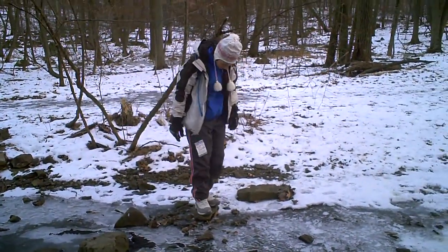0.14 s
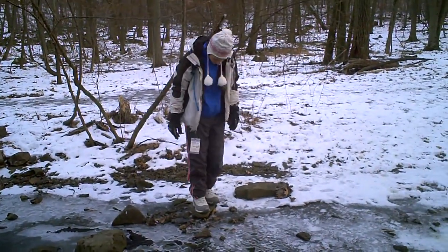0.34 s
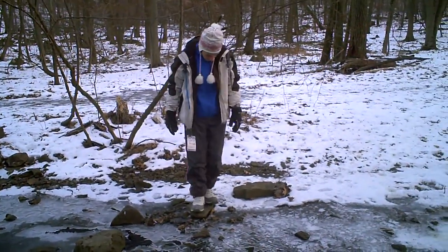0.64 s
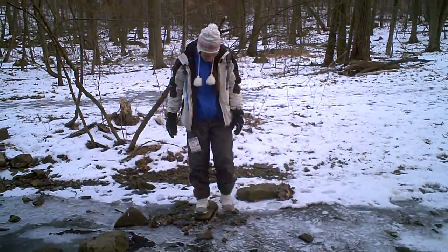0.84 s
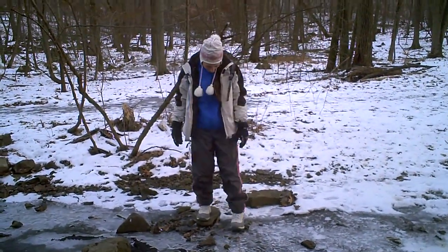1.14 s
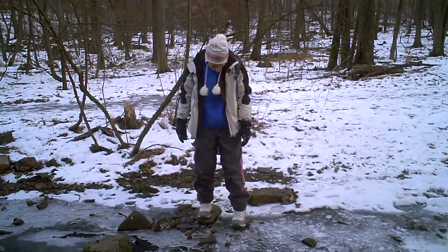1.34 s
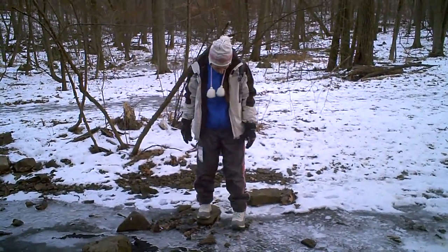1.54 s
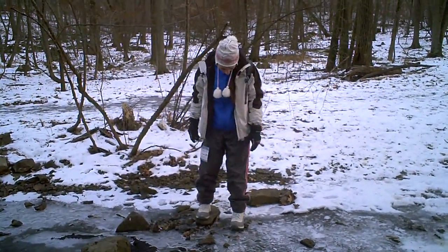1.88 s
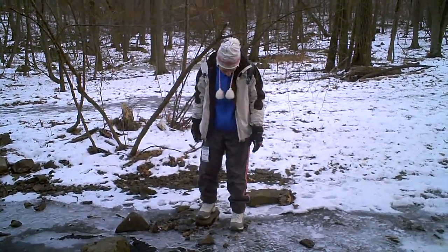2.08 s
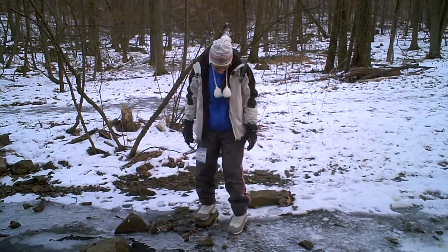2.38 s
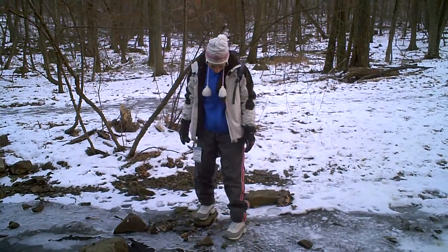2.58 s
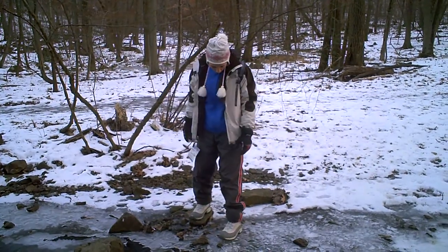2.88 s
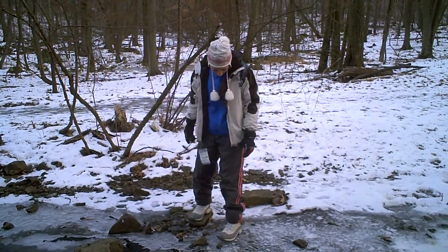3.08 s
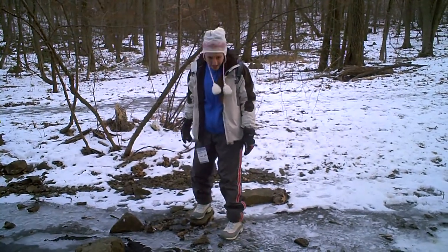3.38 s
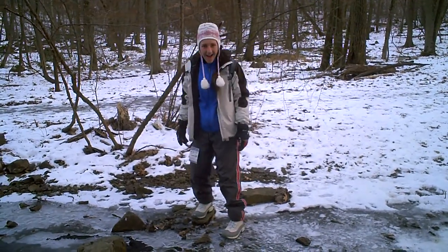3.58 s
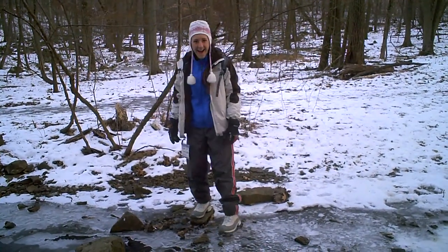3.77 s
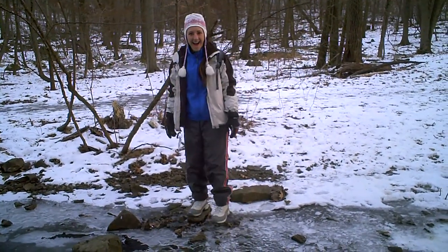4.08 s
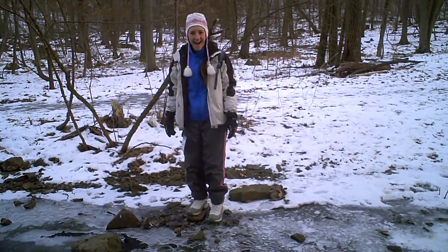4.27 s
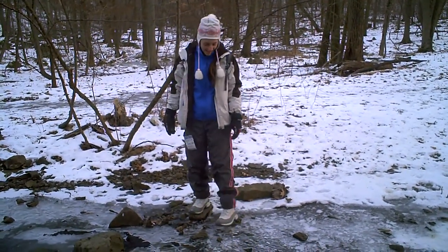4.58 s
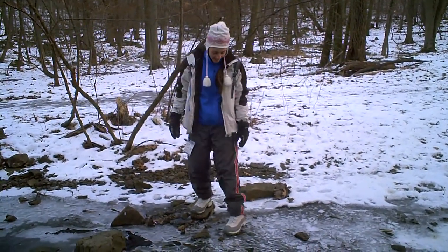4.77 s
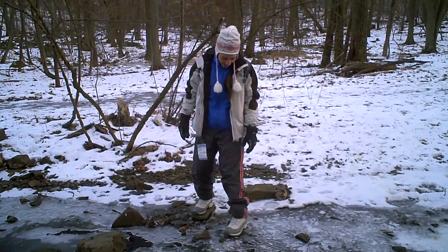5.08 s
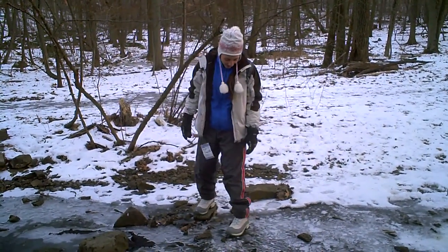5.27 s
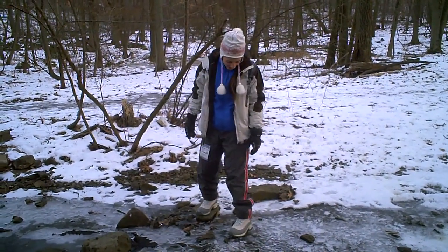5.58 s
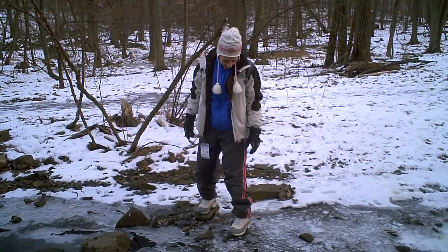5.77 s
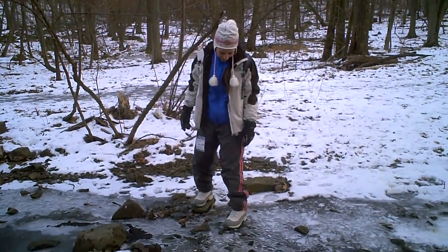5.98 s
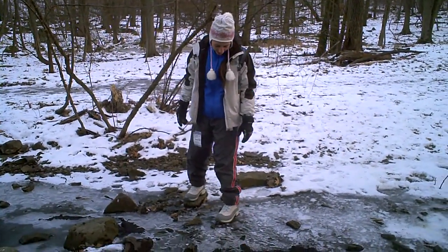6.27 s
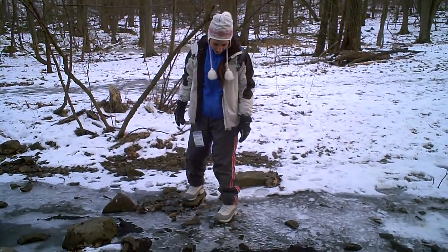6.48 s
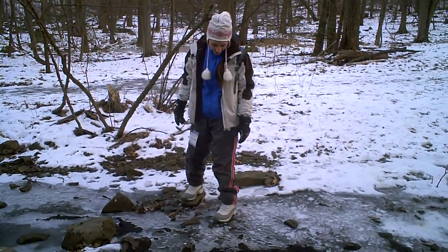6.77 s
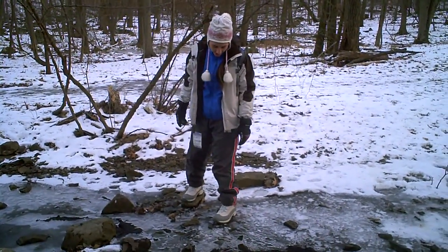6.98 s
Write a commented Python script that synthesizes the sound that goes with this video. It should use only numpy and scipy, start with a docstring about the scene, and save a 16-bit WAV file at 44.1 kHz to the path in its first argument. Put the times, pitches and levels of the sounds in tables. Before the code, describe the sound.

Outdoors in a quiet winter wood, a soft steady water and air rush continues throughout. Nylon clothing swishes faintly, a few tiny ice ticks and sole squeaks follow, then the sheet breaks in a sudden loud burst of bright snaps. After a short scrape and sparse clicks, a longer bout of crunching and cracking begins, with hollow knocks, thinning into scattered crackles. Heard from a few metres away, fairly dry.

```python
"""Boots shift and step on thin ice over a shallow creek in a winter wood, a few metres away.
Smooth noise, the rush of water and far air, lies under it all; nylon swishes first as dense friction grains.
Shards then grind as rattling grains; the sheet snaps in swarms of clicks that ring a plate; soles squeak as bent tones.
Among the snaps it knocks hollow over its air pocket and crumbles in slow swarms; a ribbed sole scrapes by stick
and slip, and midway through the second bout of grinding, separate grains bump a loose slab, one resonant mode."""
import sys
import numpy as np
from scipy import signal
from scipy.fft import rfft, irfft
from scipy.io import wavfile
from scipy.ndimage import uniform_filter1d

SR = 44100
rng = np.random.default_rng(int(sys.argv[2]) if len(sys.argv) > 2 else 0)


def transcribe(u):
    """Save the signal u as a 16-bit wav file named by the first command-line argument.

    u: samples, shape (n,) or (channels, n), limited to [-1, 1]; the rate is SR.
    q: integer samples, one column per channel.
    """
    v = np.clip(np.atleast_2d(u).T, -1, 1)
    q = np.round(v * 32767).astype(np.int16)
    wavfile.write(sys.argv[1], SR, q)


def how_loud(loudness_db):
    """Turn decibels into a plain amplitude multiplier (0 dB gives 1, 20 dB gives 10)."""
    steps = np.asarray(loudness_db, float) / 20
    return 10 ** steps


N = 314675


def curve(rows):
    """Join table columns by straight lines over time; the level column is -120 dB outside the table."""
    s, level_db, *more = np.transpose(rows)
    t = np.arange(N) / SR
    level_db = np.interp(t, s, level_db, left=-120, right=-120)
    return [level_db] + [np.interp(t, s, column) for column in more]


def unit(x):
    """Scale to rms 1."""
    return x / np.sqrt(np.mean(x ** 2) + 1e-18)


def colour(x, points):
    """Minimum-phase filter through (Hz, dB) points, built from the folded cepstrum."""
    hz, db = np.transpose(points)
    grid_hz = np.maximum(np.arange(1025) * SR / 2048, 1)
    log_gain = np.interp(np.log(grid_hz), np.log(hz), db) * np.log(10) / 20
    cepstrum = irfft(log_gain)
    cepstrum[1:1024] *= 2
    cepstrum[1025:] = 0
    impulse = irfft(np.exp(rfft(cepstrum)))
    return signal.fftconvolve(x, impulse)[:len(x)]


def ring(x, hz, width_hz):
    """One damped resonance."""
    return signal.lfilter(*signal.iirpeak(hz, hz / width_hz, SR), x)


def band(x, lo_hz, hi_hz):
    """Butterworth band-pass."""
    return signal.sosfilt(signal.butter(2, [lo_hz, hi_hz], "band", fs=SR, output="sos"), x)


def walk(rate):
    """Random levels held 1 / rate s and slewed twice; spread near 1."""
    k = int(SR / rate)
    held = np.repeat(rng.standard_normal(N // k + 1), k)
    return 1.3 * uniform_filter1d(uniform_filter1d(held, k), k)[:N]


def crackle(size, rate, spread_db):
    """Random clicks of either sign, rate per s: many small, a few large, size capped."""
    chance = rng.random((3, size))
    hit = chance[0] < rate / SR
    sign = np.sign(chance[1] - 0.5)
    return hit * sign * how_loud(-spread_db * np.log(1 - 0.97 * chance[2]))


def add(out, s, x, db):
    """Lay a burst in from time s, its envelope peak at the given level."""
    i = int(s * SR)
    x = x[:len(out) - i]
    out[i:i + len(x)] += x * how_loud(db) / np.max(np.abs(signal.hilbert(x)))


def shards(rate, spread_db, life_s, bed):
    """Each fracture rattles on for a moment, over a bed of countless tiny ones."""
    t = np.arange(512) / SR
    hits = np.abs(crackle(N, rate, spread_db))
    rattle = signal.fftconvolve(hits, np.exp(-t / life_s))[:N]
    return (unit(rattle) + bed) * rng.standard_normal(N)


STROKE_RANGE_DB = 20.5  # lost one rise time before and one fall time after the peak


def strokes(rows):
    """Level in dB of strokes that swell to a peak and fall away; the strongest counts."""
    t = np.arange(N) / SR
    levels_db = [db - STROKE_RANGE_DB * np.maximum((s - t) / rise_s, (t - s) / fall_s)
                 for s, db, rise_s, fall_s in rows]
    return np.max(levels_db, axis=0)


TRAIL = 0.2  # amplitude of splinters that settle three times slower


def add_fracture(out, s, db, hz, body_db, treble_db, t60_s, rise_s, first):
    """A crack runs through the sheet: a first break, a dying swarm of smaller ones, the plate rings briefly."""
    t = np.arange(4096) / SR
    decay = how_loud(-60 * t / t60_s) + TRAIL * how_loud(-20 * t / t60_s)
    fade = (1 - np.exp(-t / rise_s)) * decay * np.cos(np.pi * t / t[-1] / 2)
    swarm = fade * crackle(size=4096, rate=12000, spread_db=3.5)
    swarm[16] = first * np.max(np.abs(swarm))
    mode = unit(ring(swarm, hz, hz * hz / 9000 + 40))
    plate = mode + 0.5 * unit(band(swarm, 0.57 * hz, min(2.19 * hz, 6500)))
    treble = band(band(swarm, 3950, 8350), 3940, 15400)
    body = band(band(swarm, 424, 1160), 335, 1260)
    add(out, s, plate, db + 0.015)
    add(out, s, treble, db + treble_db)
    add(out, s + 0.0012, body, db + body_db)  # low bending waves arrive late


# Rush spectrum: (frequency [Hz], relative density [dB per Hz])
RUSH_SPECTRUM = [(15, -70), (25, -26.5), (170, -13), (344, -2.5), (476, -2.5), (545, -2), (624, -3.5),
                 (796, -1.5), (962, -5), (1520, -13), (2220, -17.5), (7510, -26.5), (16000, -39.5)]
RUSH_DB = -58.5


def wood():
    """Distant water and air: smooth coloured noise, level wandering slightly."""
    rush = unit(colour(rng.standard_normal(N), RUSH_SPECTRUM))
    return how_loud(RUSH_DB + 0.5 * walk(11)) * rush


# Nylon sleeve and leg strokes: (peak time [s], level [dB], rise [s], fall [s])
SWISH_STROKES = [(0.214, -54, 0.22, 0.13), (0.484, -52, 0.24, 0.12), (0.746, -61.5, 0.26, 0.17)]
# Nylon spectrum: (frequency [Hz], relative density [dB per Hz])
NYLON_SPECTRUM = [(710, -29), (1200, -7), (1870, 2), (2200, -3), (5900, -10), (8260, -8.5), (11200, -17),
                  (16000, -35)]


def swish():
    """Very dense fibre friction, nearly smooth."""
    level_db = strokes(SWISH_STROKES) + 0.81 * walk(40.8)
    return how_loud(level_db) * unit(colour(crackle(N, rate=8300, spread_db=2.5), NYLON_SPECTRUM))


# Shards under the sole: (time [s], fine level [dB], thick level [dB])
GRIND_LEVELS = [(0.9, -80, -70.5), (1.7, -79, -67), (2.0, -73, -63), (2.5, -69, -67.5), (2.64, -70, -73),
                (2.74, -58, -60), (2.8, -38, -49), (2.92, -39, -46.5), (3.08, -49.5, -53),
                (3.16, -58, -68.5), (3.56, -65.5, -59), (3.68, -46, -54.5), (3.8, -57, -53),
                (3.92, -66, -57), (4.28, -69, -66.5), (4.4, -60.5, -64), (4.62, -74, -73), (4.68, -55, -42),
                (4.84, -44, -41.5), (5.04, -50.5, -50.5), (5.16, -47, -53), (5.3, -52.5, -39.5),
                (5.46, -62, -48), (5.54, -70, -55.5), (5.64, -49, -56.5), (5.76, -65, -61), (6.0, -54, -50),
                (6.34, -61, -56), (6.5, -67, -52), (6.74, -61.5, -60.5), (7.04, -53.5, -56.5),
                (7.13, -55, -52)]
# Fine shard spectrum: (frequency [Hz], relative density [dB per Hz])
SHARD_SPECTRUM = [(710, -57), (1200, 0.5), (2200, 3.5), (3320, 3), (4910, 6), (5900, 2.5), (7660, -2),
                  (10400, -5), (16000, -50)]
SLIDE_DB, SLIDE_S = -14.5, 0.01  # splinters sliding on, re running rms of the breaks; averaging time


def grind(snapped):
    """Fine shards tick bright and dense, more so after a break; thicker wet ones crunch lower."""
    fine_db, thick_db = curve(GRIND_LEVELS)
    keep = np.exp(-1 / (SLIDE_S * SR))
    slide = how_loud(SLIDE_DB) * np.sqrt(signal.lfilter([1 - keep], [1, -keep], snapped ** 2))
    fine = unit(colour(shards(rate=300, spread_db=5, life_s=0.0012, bed=0.45), SHARD_SPECTRUM))
    thick = unit(band(shards(rate=200, spread_db=5, life_s=0.011, bed=0.35), 364, 1720))
    underway = np.arange(N) / SR > GRIND_LEVELS[0][0]
    return (how_loud(fine_db) + slide) * fine + underway * how_loud(thick_db) * thick


SMALL_SNAPS_PER_S = 12
SMALL_DB, SMALL_SCATTER_DB = 10.5, 3.5  # re thick grinding
SMALL_BODY_DB, SMALL_TREBLE_DB = -10.5, -7  # means, re plate
SMALL_LOW_HZ, SMALL_OCTAVES = 847, 2.06


def small_snaps():
    """Lesser fractures at random once grinding starts, their strength following the thick grinding."""
    count = int(SMALL_SNAPS_PER_S * N / SR)
    when, pitch = rng.random((count, 2)).T
    size, body, treble = rng.standard_normal((count, 3)).T
    position = when * (N - 1)
    grind_db = curve(GRIND_LEVELS)[1][position.astype(int)]
    rows = np.transpose([position / SR - 0.002,
                         grind_db + SMALL_DB + SMALL_SCATTER_DB * size,
                         SMALL_LOW_HZ * 2 ** (SMALL_OCTAVES * pitch ** 2),
                         SMALL_BODY_DB + 6 * body,
                         SMALL_TREBLE_DB + 7 * treble])
    return snaps(rows[rows[:, 0] > GRIND_LEVELS[0][0]])


# Loud snaps of the sheet:
# (time [s], plate level [dB], plate ring [Hz], low body re plate [dB], treble re plate [dB])
LOUD_SNAPS = [(1.0406, -42.5, 2000, -15, -12), (1.0665, -46, 2040, -15, -20),
              (1.079, -41.5, 1650, -14, -13), (1.1524, -49.5, 2030, -12, -2), (1.1774, -54, 1130, -2, 1),
              (2.3195, -45.5, 1730, -14, -3), (2.386, -37, 1620, -29, -34), (2.6329, -29.5, 2100, -31, -22),
              (2.6613, -18.5, 2010, -15, -9), (2.7039, -20, 1680, -37, 3), (2.751, -18, 2090, -28, -12),
              (2.7788, -6.5, 2050, -19, -10), (2.7903, -13, 3200, -18, -9), (2.7963, -20.5, 1990, -9.5, -2),
              (2.8161, -20.5, 3380, -34, 0), (2.8199, -11.5, 4950, -24, -12), (2.8477, -15, 2820, -20, -4),
              (2.853, -20, 1070, -32, -19), (2.8657, -27, 940, -25, 1), (2.8826, -34, 1780, -11, -3),
              (2.8885, -16.5, 2200, -27, -11), (2.8973, -10.5, 2870, -12, -9),
              (2.9074, -18.5, 1340, -11, -5), (2.9378, -20.5, 2700, -12, -10), (2.9487, -28, 3410, -16, -8),
              (2.9685, -21.5, 2360, -20, -9), (2.9965, -11.5, 3700, -16, -8),
              (3.0383, -15.5, 2630, -14, -12), (3.0625, -19.5, 3900, -18, -14),
              (3.0997, -25.5, 3080, -27, -11), (3.184, -32, 3970, -29, -8), (3.2128, -31, 2520, -29, -16),
              (3.227, -29.5, 3970, -23, -12), (3.2524, -34.5, 1920, -27, 5.5),
              (3.2898, -34.5, 1820, -18, -12), (3.3419, -23.5, 2180, -27, -6),
              (3.3493, -17.5, 2600, -16.5, -11), (3.3684, -48, 4100, -22, -22), (3.419, -42, 3980, -9, -17),
              (3.4314, -32.5, 1150, -2, -27), (3.4511, -27, 940, 0, -32), (3.4916, -35, 1760, -13, -23),
              (3.525, -35, 975, -13, -14), (3.7746, -28, 1520, -4.5, -17), (3.8478, -27.5, 3460, -20, -27),
              (3.9689, -41, 902, -11, -3), (4.0158, -29, 3560, -27, -17), (4.0271, -33, 1680, -22, -10),
              (4.0961, -37, 930, -10, -5), (4.145, -44, 1360, -17, 1), (4.4143, -47, 1670, -16, 6),
              (4.5362, -32.5, 1710, -28, -7), (4.5544, -55, 1020, -14, 9), (4.5972, -30.5, 1830, -24, -1.5),
              (4.6524, -31, 1060, -4, 2), (4.7693, -32, 1880, -1, -12), (4.7995, -19, 1970, -3.5, -27),
              (4.8325, -23.5, 1410, -8, 0), (4.8572, -17.5, 2680, -7.5, -1), (4.8735, -21.5, 1750, -22, -6),
              (4.9546, -28.5, 1370, -6, -11), (4.9662, -25.5, 1170, -10, -11), (4.9772, -19, 1180, -16, -3),
              (5.0095, -30, 2110, -24, 3.5), (5.035, -27, 2820, -26, -9), (5.0622, -16, 3670, -14.5, -14),
              (5.078, -13, 4210, -29, -8), (5.1036, -23.5, 1750, -21, -7), (5.1103, -20.5, 2910, -20, 3),
              (5.1308, -24.5, 3280, -15, -2), (5.1567, -22.5, 3800, -14.5, -12),
              (5.2041, -17, 4070, -32, -15), (5.232, -23.5, 1020, -20, -0.5), (5.2565, -25, 1030, -22, -26),
              (5.2799, -33, 1120, -16, -16), (5.2998, -25.5, 1070, -25, -2),
              (5.3409, -12.5, 4240, -31, -22), (5.3777, -44, 1030, -11, -20), (5.4001, -47, 1340, -16, -19),
              (5.4213, -39.5, 1260, -12, -18), (5.4824, -35, 1410, -7, -20), (5.5243, -33, 990, -16, -22),
              (5.6266, -37, 1370, -2, -16), (5.6745, -28.5, 1800, -19, 2), (5.7408, -34, 1300, 0, -17),
              (5.8586, -25, 3100, -28, -16), (5.8701, -33, 1180, -15, 2.5), (5.906, -20.5, 930, -34, -2),
              (5.9518, -43, 1060, 3, -6), (5.9853, -18, 1280, -2.5, -34), (5.991, -17.5, 1350, -6, -4.5),
              (6.0029, -23, 1980, -7, 0), (6.0154, -29, 1300, -13, -17), (6.1271, -33.5, 1240, 0.5, -16),
              (6.1372, -23.5, 1450, -3.5, -5.5), (6.148, -37, 1290, -9, -17), (6.3069, -21, 3800, -29, -9),
              (6.4114, -41.5, 1040, -21, -13), (6.5346, -36.5, 1130, -12, -27),
              (6.543, -38, 1170, -11, -27), (6.5488, -33.5, 1100, -8, -19), (6.5836, -44, 1140, 5, -26),
              (6.7135, -36, 1210, -15, -4), (6.8323, -29.5, 1170, -13, -8), (6.846, -24, 3740, -27, -11),
              (6.9207, -35.5, 1150, -13, -2), (6.9462, -31.5, 1080, -27, -14), (7.01, -33.5, 2320, -12, -4),
              (7.0465, -29, 3800, -29, 1), (7.0763, -29, 2370, -26, -10), (7.0824, -32, 3690, -26, -11)]
SNAP_T60_S, SNAP_RISE_S = 0.016, 0.00047  # t60 at 2 kHz
THICK_SLOWER, T60_SCATTER = 0.18, 0.16  # low, thick pieces ring longer (power of pitch); log spread


def snaps(rows):
    """Sudden breaks led by their strongest click."""
    out = np.zeros(N)
    for s, db, hz, body_db, treble_db in rows:
        scatter = np.exp(T60_SCATTER * rng.standard_normal())
        t60_s = SNAP_T60_S * (2000 / hz) ** THICK_SLOWER * scatter
        add_fracture(out, s, db, hz, body_db, treble_db, t60_s, SNAP_RISE_S, first=1.365)
    return out


# Rubber on ice: (start time [s], length [ms], top pitch [Hz], peak level [dB], roughness [0-1])
RUBBER_SQUEAKS = [(1.086, 9, 5700, -46, .5), (1.796, 50, 630, -37, 0.1), (1.782, 35, 6300, -47, 1),
                  (1.843, 31, 1450, -48, 0.7), (2.035, 85, 1550, -50, 1)]
SQUEAK_BEND_HZ = 120  # pitch arches up by this much


def squeaks():
    """Fast slipping: a bending tone; rough contact breaks it up into a narrow hiss."""
    out = np.zeros(N)
    for s, length_ms, top_hz, db, rough in RUBBER_SQUEAKS:
        n = int(length_ms * SR / 1000)
        hz = top_hz - SQUEAK_BEND_HZ * np.abs(np.linspace(-1, 1, n))
        grip = 1 - rough + rough * walk(top_hz / 5)[:n]
        size = signal.windows.tukey(n, 0.4) * how_loud(walk(61)[:n]) * grip
        add(out, s, size * np.sin(2 * np.pi * np.cumsum(hz) / SR), db)
    return out


# Hollow knocks over the air pocket: (start time [s], peak level [dB], pitch [Hz], t60 [s])
HOLLOW_KNOCKS = [(2.661, -41.5, 430, 0.087), (3.037, -26, 572, 0.025), (3.431, -32, 766, 0.027),
                 (3.45, -25.5, 850, 0.033), (4.856, -38, 490, 0.038), (4.89, -41, 296, 0.044),
                 (5.06, -39, 438, 0.057), (5.743, -38, 286, 0.072), (5.871, -39.5, 340, 0.027),
                 (5.905, -25.5, 280, 0.03), (5.979, -31.5, 325, 0.073), (5.994, -23, 307, 0.048),
                 (6.136, -36.5, 315, 0.045), (6.268, -45.5, 454, 0.069)]


def knocks():
    """A soft push into the air pocket under the ice: a damped tone of unsteady phase."""
    out, t = np.zeros(N), np.arange(4096) / SR
    for s, db, hz, t60_s in HOLLOW_KNOCKS:
        push = (1 - np.exp(-t / 0.00077)) ** 2 * how_loud(-60 * t / t60_s)
        tone = np.sin(2 * np.pi * hz * t + 1.22 * walk(154)[:4096])
        add(out, s, band(push * tone, 232, 1550), db)
    return out


# Patches crumbling under the sole:
# (time [s], plate level [dB], plate ring [Hz], treble re plate [dB], t60 [s])
CRUMBLES = [(2.681, -28, 1150, 1, 0.036), (3.24, -35.5, 3730, -20, .04), (3.71, -35.5, 1510, -3, 0.071),
            (4.004, -33, 1670, 1.5, 0.13), (4.68, -31, 1500, -7, .07), (4.721, -34.5, 1170, -2, 0.13),
            (4.82, -30.5, 1020, 3, 0.12), (5.248, -30, 1070, -24, 0.033), (5.329, -21.5, 1030, -0.5, 0.019),
            (5.667, -41, 2900, -1, 0.018), (5.977, -28.5, 1400, 0.5, 0.13), (6.265, -36, 1140, -9, .09),
            (6.984, -37, 950, -10, 0.08)]
CRUSH_BODY_DB, CRUSH_RISE_S = -14, 0.0052  # body re plate


def crushes():
    """Slower breaks that swell and crumble on."""
    out = np.zeros(N)
    for s, db, hz, treble_db, t60_s in CRUMBLES:
        add_fracture(out, s, db, hz, CRUSH_BODY_DB, treble_db, t60_s, CRUSH_RISE_S, first=0.5)
    return out


# Ribbed sole over a rough edge: (time [s], level [dB], slip rate [1/s])
SCRAPE_PATH = [(3.59, -57, 170), (3.62, -44.5, 160), (3.65, -43, 130), (3.7, -45.5, 170), (3.73, -49, 140),
               (3.79, -53, 99), (3.81, -75, 170)]
# Sole resonances: (frequency [Hz], width [Hz], relative level [dB])
SOLE_MODES = [(3760, 2300, -9.5), (6200, 2300, -18), (8100, 5900, -24)]


def scrape():
    """Each rib sticks and lets go with a puff of grit, rung through the sole."""
    level_db, slips_per_s = curve(SCRAPE_PATH)
    phase = np.cumsum(slips_per_s * (1 + 0.045 * walk(110))) / SR % 1
    grit = (np.exp(-phase / 0.2) + 0.2) * rng.uniform(-1, 1, N)
    sole = sum(how_loud(db) * ring(ring(grit, hz, width_hz), hz, width_hz) for hz, width_hz, db in SOLE_MODES)
    return how_loud(level_db) * unit(unit(sole) + 0.6 * unit(colour(grit, SHARD_SPECTRUM)))


# Bumps of a loose slab: (peak time [s], level [dB])
SLAB_BUMPS = [(4.8, -42), (4.868, -47), (4.971, -35.5), (5.12, -42.5), (5.18, -49), (5.31, -48)]
SLAB_HZ, SLAB_WIDTH_HZ = 785, 45
SLAB_RISE_S, SLAB_FALL_S = 0.058, 0.035


def slab():
    """Separate grains knock one mode of a loose slab, on and off; the resonance is applied twice."""
    once = ring(crackle(N, rate=250, spread_db=3), SLAB_HZ, SLAB_WIDTH_HZ)
    bumps_db = strokes([(s, db, SLAB_RISE_S, SLAB_FALL_S) for s, db in SLAB_BUMPS])
    return how_loud(bumps_db) * unit(ring(once, SLAB_HZ, SLAB_WIDTH_HZ))


TREES_T60_S, TREES_DB = 0.067, -21  # level: total energy re direct sound


def trees(near):
    """Short scatter from banks and trunks: decaying noise from 3 ms on."""
    t = np.arange(SR // 4) / SR
    scatter = band(rng.standard_normal(len(t)), 400, 6000) * how_loud(-60 * t / TREES_T60_S) * (t > 0.003)
    scatter = how_loud(TREES_DB) * scatter / np.sqrt(np.sum(scatter ** 2))
    return signal.fftconvolve(near, scatter)[:N]


def scene():
    """Near sounds and their scatter, over the wood."""
    loud = snaps(LOUD_SNAPS) + crushes()
    ice = loud + small_snaps() + knocks() + grind(loud) + slab()
    near = ice + swish() + scrape() + squeaks()
    return (near + trees(near) + wood())[None]


def top_cut(x):
    """Nothing passes above the cut-off."""
    return signal.sosfilt(signal.butter(12, 16760, fs=SR, output="sos"), x)


def record(dry):
    """Deliver the finished mix."""
    return top_cut(dry)


dry = scene()
out = record(dry)
transcribe(out)
```